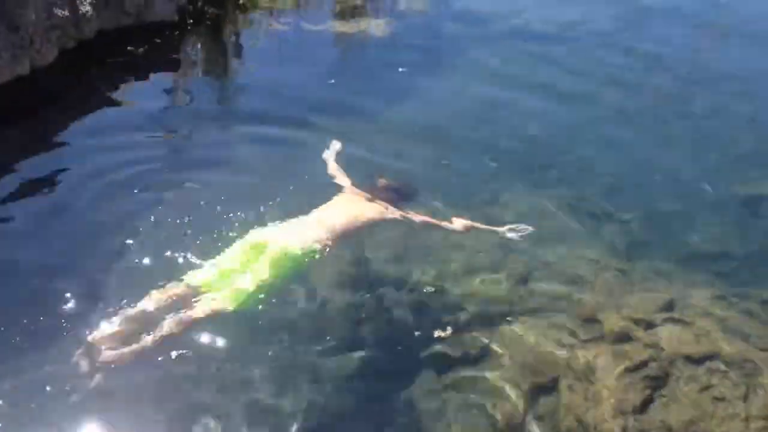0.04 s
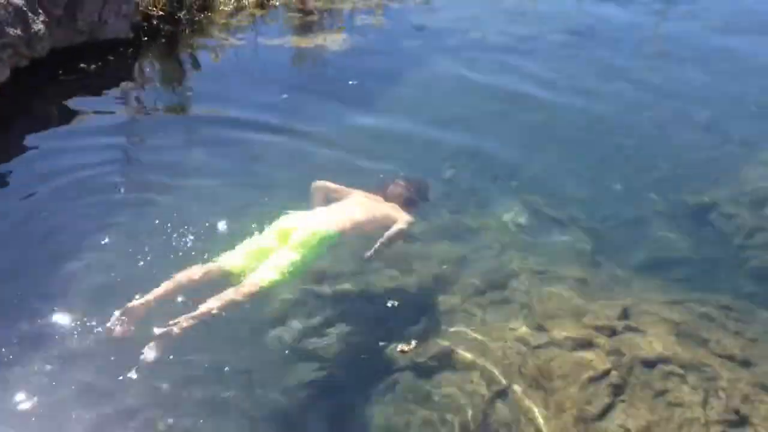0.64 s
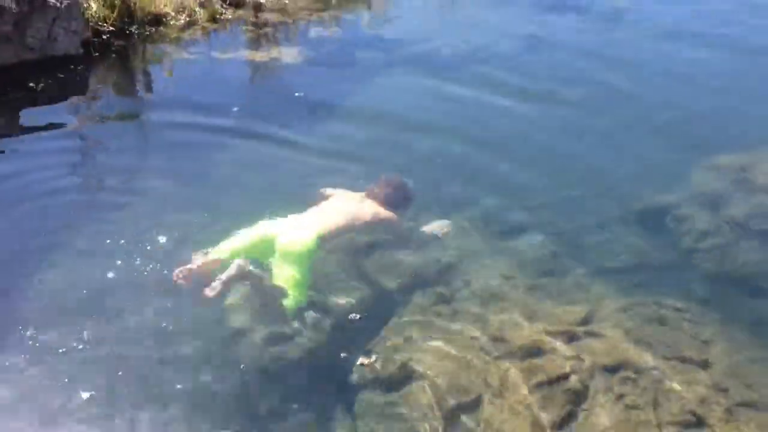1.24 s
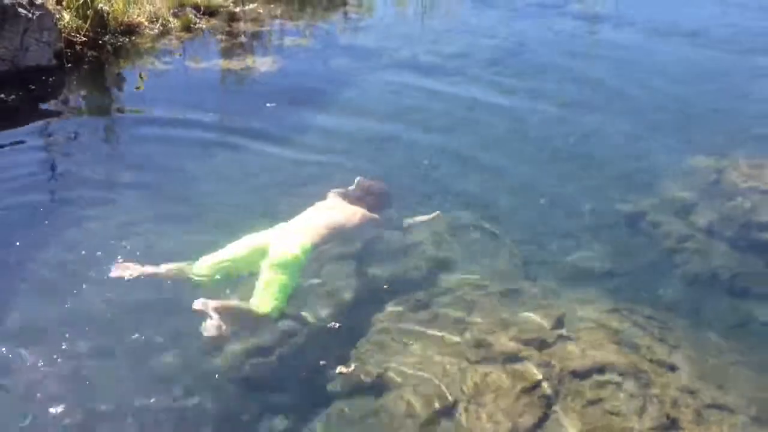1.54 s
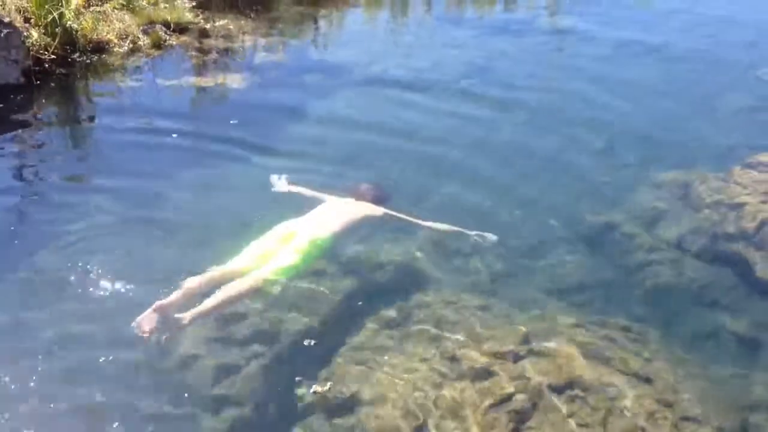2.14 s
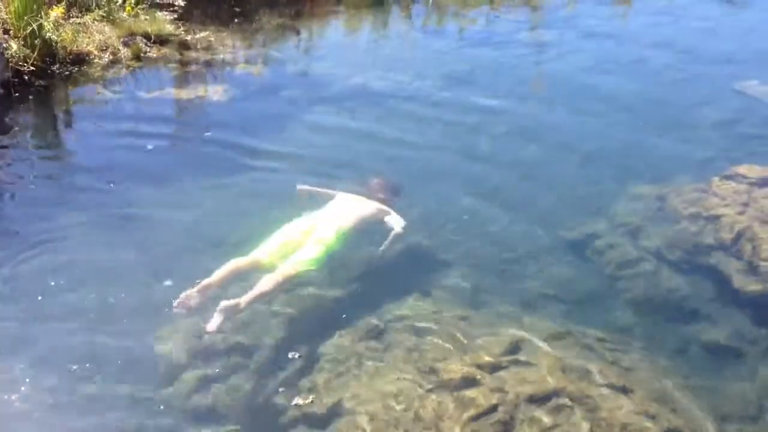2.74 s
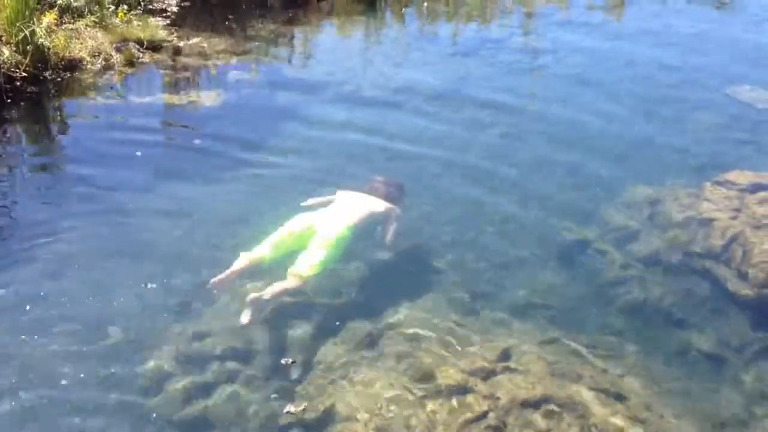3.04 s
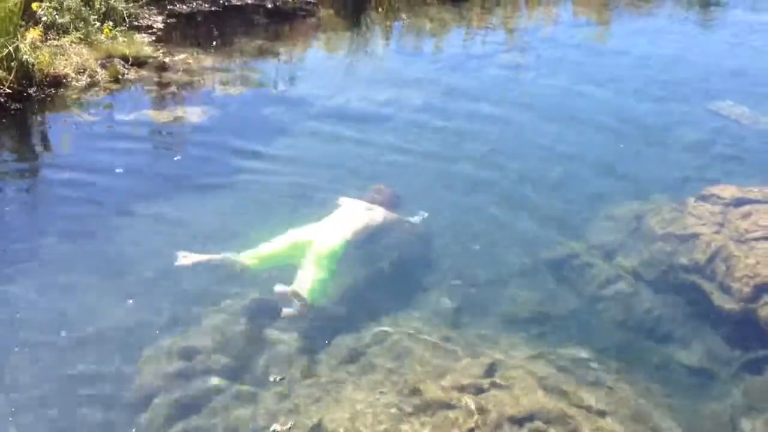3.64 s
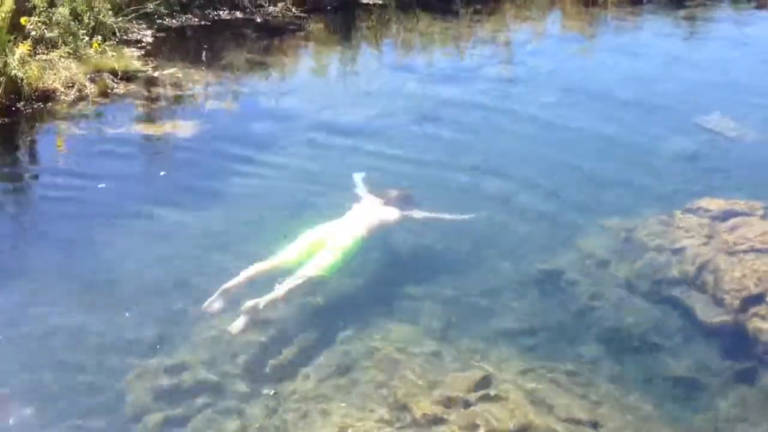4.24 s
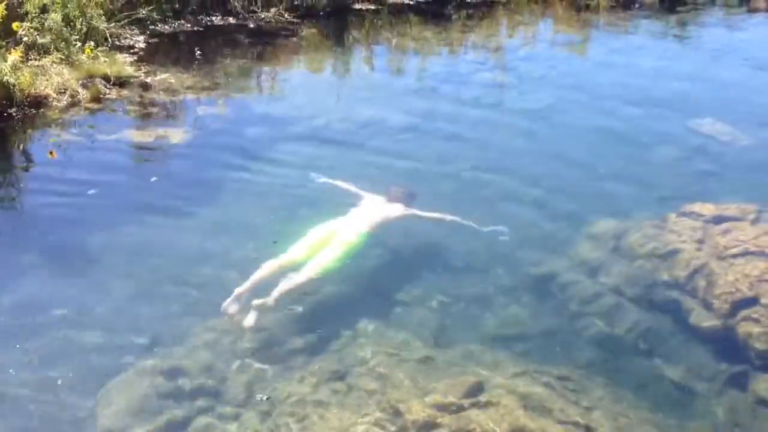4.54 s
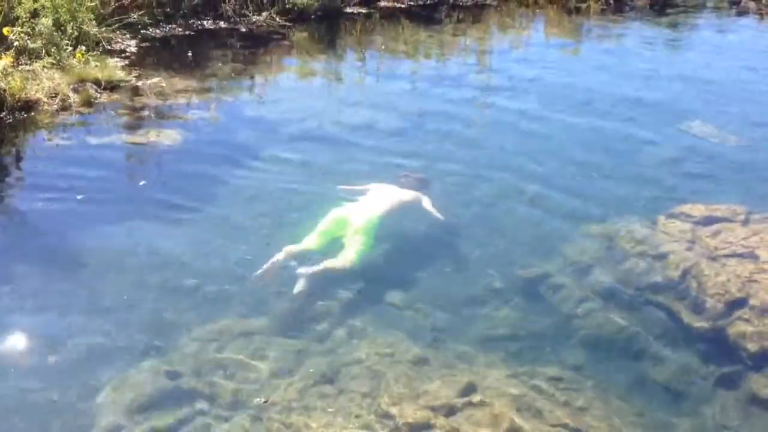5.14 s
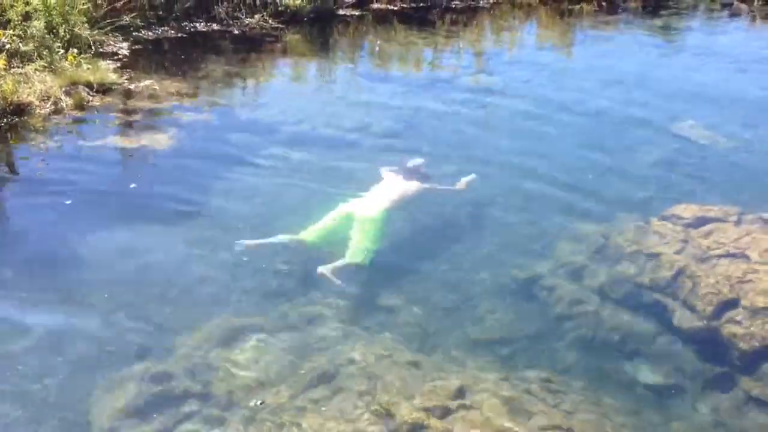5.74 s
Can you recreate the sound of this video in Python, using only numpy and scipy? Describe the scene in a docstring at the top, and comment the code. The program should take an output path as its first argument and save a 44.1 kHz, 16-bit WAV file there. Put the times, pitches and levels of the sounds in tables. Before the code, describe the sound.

A swimmer takes a slow stroke in an outdoor rock pool, a few metres from the microphone. Hands and feet make light splashes, followed by fine spray and small plinking bubbles, while wind softly bumps the microphone. As the water settles, the wind builds into a loud, buffeting gust with sharp crackles that dominates the second half. A very faint, high insect chirps over a quiet hiss of air.

```python
"""A swimmer does a slow breaststroke in a rock pool, a few metres below a hand-held camera.
Hands and feet break the surface in light slaps, spray patters back, and trapped air rings as bubbles.
Wind eddies bump the microphone, softly at first, then in a loud gust whose hardest eddies crack.
Far behind, an insect scrapes faint, high chirps over an even hiss of air."""
import sys
import numpy as np
from scipy import signal
from scipy.fft import rfft, irfft
from scipy.io import wavfile

SR = 44100
rng = np.random.default_rng(int(sys.argv[2]) if len(sys.argv) > 2 else 0)


def inscribe(sig):
    """Save sig as 16-bit PCM at rate SR to the path in sys.argv[1].

    A 1-D sig is mono; a 2-D sig holds one channel per row.
    Samples are clipped to [-1, 1] before scaling.
    """
    pcm = np.round(np.clip(np.atleast_2d(sig).T, -1, 1) * 32767)
    wavfile.write(sys.argv[1], SR, pcm.astype(np.int16))


N = 263718


# hands and feet hitting the water: (time [s], level [dB], plash against hiss [dB])
LIMB_HITS = [(0.738, -42, -9), (0.8434, -53, 3), (0.87, -50.5, 3), (1.346, -39, -35), (1.482, -34.5, -5),
             (1.516, -44.5, -1), (1.5662, -37.5, -6.5), (1.652, -41.5, -35), (1.8094, -41, -13),
             (1.901, -43, -1.5)]

def slaps(gain_db=-7, plash_db=-1, decay_s=0.011, plash_s=0.011, rise_s=0.0011, size=4096):
    """A limb breaks the surface: a bright hiss of spray over a lower plash."""
    out = np.zeros(N)
    t = np.arange(size) / SR
    attack = 1 - np.exp(-t / rise_s)
    plash_band = signal.butter(2, [550, 2300], "bandpass", fs=SR, output="sos")
    hiss_band = signal.butter(2, 3500, "highpass", fs=SR, output="sos")
    for start, db, balance_db in LIMB_HITS:
        droplets = patter(size, drop_rate=32000, scatter_db=3.0, mist=0.23)
        hiss = unit(signal.sosfilt(hiss_band, droplets)) * np.exp(-t / decay_s)
        plash = unit(signal.sosfilt(plash_band, rng.standard_normal(size))) * np.exp(-t / plash_s)
        add(out, start, undb(db + gain_db) * (hiss + undb(balance_db + plash_db) * plash) * attack)
    return out


# the arm pull, then the kick: (time [s], spray level [dB], bubble level [dB], fade [dB/s])
SWIM_STROKES = [(0.72, -63.5, -64, 27), (1.474, -58, -52, 12)]

def churn(t, bubbles=False):
    """Envelope of the stirred water: each stroke swells, then dies away."""
    rise_s = 0.4 if bubbles else 0.0047  # bubbles take time to come up; spray falls back at once
    total = 0
    for start, spray_db, bubble_db, fade_db_per_s in SWIM_STROKES:
        age = np.maximum(t - start, 0)
        db = bubble_db if bubbles else spray_db
        total += (1 - np.exp(-age / rise_s)) * undb(db - fade_db_per_s * age)
    return total


def spray(drop_rate=1800, scatter_db=3.0, mist=0.99, clump_db=2, clump_s=0.006):
    """Fine droplets patter back on the water in clumps, and foam fizzes between them."""
    t = np.arange(N) / SR
    clumps = np.interp(t / clump_s, np.arange(N), rng.standard_normal(N))
    return patter(N, drop_rate, scatter_db, mist) * undb(clump_db * clumps) * churn(t)


# tone of splashing water: (frequency [Hz], gain [dB])
SPLASH_EQ = [(700, -5), (1100, -1), (2000, 0), (2900, -13), (4200, -4), (6500, 1.5), (8500, -3.5),
             (10000, -9.5), (15000, -15)]

def patter(size, drop_rate, scatter_db, mist, bands=26):
    """Tiny impacts of unequal size, each ringing a few cycles in its own band, over a fine mist."""
    impacts = np.zeros(size)
    edges_hz = np.geomspace(900, 15000, bands + 1)
    for low, high in zip(edges_hz, edges_hz[1:]):
        hits = rng.random(size) < drop_rate / bands / SR
        strength = undb(scatter_db * np.minimum(rng.exponential(size=size), 4))
        ticks = hits * strength * rng.choice([-1, 1], size)
        ring = signal.butter(1, [low, high], "bandpass", fs=SR, output="sos")
        impacts += signal.sosfilt(ring, ticks + 1e-9 * rng.standard_normal(size))
    return unit(colour(unit(impacts) + mist * rng.standard_normal(size), SPLASH_EQ))


def wake(plop_db=1, fizz_db=2, gurgle_db=-3, scatter_db=4, glide=0.062, length_s=2.3, count=260):
    """Air dragged under rings as bubbles: small ones plop, tiny ones fizz, big pockets gurgle."""
    out = np.zeros(N)
    for when, pitch, strength, delay in rng.random((count, 4)):
        start = SWIM_STROKES[0][0] + length_s * when
        db = -scatter_db * np.log(strength + 0.083) - scatter_db  # many quiet, a few loud
        plop = undb(plop_db + db) * bubble(850 * 3 ** pitch, cycles=12, glide=glide)
        fizz = undb(fizz_db + db) * bubble(3800 * 2.3 ** pitch, cycles=18, glide=glide)
        gurgle = undb(gurgle_db + db) * bubble(280 * 3 ** pitch, cycles=6, glide=glide)
        add(out, start, churn(start, bubbles=True) * plop)
        for follower in (fizz, gurgle):  # these ride the spray's envelope
            start += delay / 10
            add(out, start, churn(start) * follower)
    return out


# featured bubbles, tiny under drops and larger in the wake: (time [s], level [dB], centre pitch [Hz])
PLINKS = [(0.5526, -57, 5000), (0.581, -57, 2200), (0.723, -56, 1790), (0.833, -53, 2470),
          (0.93, -56, 1074), (0.985, -54, 4360), (1.015, -58, 1065), (1.299, -45.5, 6240),
          (1.3225, -50, 5930), (1.4773, -31, 6400), (1.61, -47, 1240), (1.909, -47.5, 1080),
          (2.166, -53, 4400), (2.46, -47, 6000), (2.622, -61, 3760), (2.797, -58, 4560)]

def plinks(cycles=34, glide_per_s=3.6):
    """Single bubbles stand out; the larger ones ring longer and slide further up through their pitch."""
    out = np.zeros(N)
    for start, db, hz in PLINKS:
        glide = glide_per_s * cycles / hz
        add(out, start, undb(db) * bubble(hz * (1 - glide / 2), cycles, glide))
    return out


def bubble(hz, cycles, glide, size=4096):
    """A bubble rings for some cycles and climbs in pitch as it nears the surface."""
    t = np.arange(size) / SR
    age = t * hz / cycles
    bend = 1 + glide * np.minimum(age, 2)
    return np.sin(2 * np.pi * hz * t * bend) * np.exp(-np.log(30) * age)


# big wind eddies: (time [s], level [dB])
WIND_THUMPS = [(0.011, -42.5), (0.043, -41), (0.169, -53.5), (0.378, -42), (0.508, -44), (0.569, -43.5),
               (0.735, -43.5), (1.1, -49), (1.187, -41.5), (1.271, -45.5), (1.317, -31.5), (1.349, -44),
               (1.48, -42), (1.53, -45.5), (1.562, -40.5), (1.609, -52.5), (2.306, -35.5), (2.396, -29),
               (2.483, -30), (2.57, -37.5), (2.68, -43), (2.875, -47.5), (2.979, -38), (3.013, -37),
               (3.302, -44.5), (3.408, -32), (3.488, -29), (3.582, -24.5), (3.612, -27), (3.641, -30),
               (3.775, -30.5), (3.876, -24), (4.016, -27.5), (4.188, -24.5), (4.264, -31.5), (4.289, -33),
               (4.4, -29), (4.683, -22), (4.711, -24), (4.759, -20), (4.8, -19), (4.862, -18.5),
               (5.035, -21.5), (5.074, -22.5), (5.194, -23), (5.281, -22.5), (5.419, -25.5), (5.595, -29),
               (5.744, -25), (5.775, -25.5), (5.835, -28), (5.879, -24), (5.91, -28.5), (5.958, -30)]

def buffets(gain_db=3.0, calm_hz=263, bright_db=-30, db_per_doubling=3.5):
    """Big eddies thump the microphone port; stronger ones hold smaller swirls and sound brighter."""
    out = np.zeros(N)
    for time, db in WIND_THUMPS:
        corner_hz = calm_hz * (1 + 2 ** ((db - bright_db) / db_per_doubling))
        bump = eddy(db + gain_db, corner_hz, spread_s=0.01, low_hz=190, thump=1.08)
        add(out, time - len(bump) / SR / 2, bump)
    return out


# the hardest eddies: (time [s], thump level [dB], snap level [dB], snap corner [Hz], roughness [ratio])
WIND_CRACKS = [(3.45, -28, -44.5, 1830, 0.42), (3.7175, -24.5, -40, 1130, 0.4),
               (3.914, -19, -38, 1300, 1.05), (3.966, -27, -41.5, 1300, 0.5), (4.116, -16.5, -35, 4600, .1),
               (4.15, -18, -32, 1900, 0.7), (4.371, -24, -30, 1200, 0.58), (4.596, -17.5, -31, 2100, 0.6),
               (4.613, -27, -29, 1900, 0.77), (4.639, -21.5, -31, 1900, 0.4),
               (4.73, -16.5, -33.5, 2670, 0.42), (4.779, -22.5, -26, 2280, 1.1),
               (4.848, -21, -22.5, 3560, 0.93), (4.877, -26.5, -27, 3000, 1.1),
               (4.9812, -29.5, -23, 2630, 0.2), (5.097, -32, -30.5, 4000, 0.08),
               (5.12, -24, -29.5, 2920, 0.8), (5.147, -32, -32.5, 1090, 0.47),
               (5.166, -36.5, -28, 2400, .9), (5.47, -21.5, -42.5, 1700, 0.16),
               (5.519, -23.5, -37, 1930, 0.17), (5.561, -23, -35.5, 1500, 0.38),
               (5.816, -29, -37, 900, 0.42)]

def cracks(snap_gain_db=2.0, rasp_gain_db=-9, thump_gain_db=3, flutter=0.15, flutter_s=0.0018,
           top_hz=8200, size=4096):
    """The hardest eddies snap on top of a thump; the rough ones flutter and rasp as well."""
    out = np.zeros(N)
    t = (np.arange(size) - size / 2) / SR
    snap_band = signal.butter(4, 1000, "highpass", fs=SR, output="sos")
    for time, thump_db, snap_db, corner_hz, rough in WIND_CRACKS:
        push = rough * flutter * rng.standard_normal(size) * bell(t, flutter_s)
        push[size // 2] += rng.choice([-1, 1])
        spike = port(push, low_hz=520, corner_hz=corner_hz, slope=1.77)
        treble_rms = np.sqrt(np.sum(signal.sosfilt(snap_band, spike) ** 2) / (.003 * SR))  # over 3 ms
        snap = undb(snap_db + snap_gain_db) * spike / treble_rms
        rasp = eddy(snap_db + rasp_gain_db, corner_hz=1700, spread_s=0.0087, low_hz=1040, thump=0)
        body = eddy(thump_db + thump_gain_db, corner_hz=700, spread_s=0.011, low_hz=178, thump=0.84)
        add(out, time + t[0], snap + rough * rasp + body)
    return signal.sosfilt(signal.butter(10, top_hz, fs=SR, output="sos"), out)


# level ride of the wind bed between the big eddies: (time [s], level [dB])
WIND_BED = [(0.0, -59), (1.1, -67.5), (1.27, -55.5), (1.43, -48), (1.66, -67), (2.15, -66.5), (2.31, -48.5),
            (2.45, -40.5), (2.55, -40), (2.7, -52.5), (2.98, -66), (3.33, -53.5), (3.61, -36.5),
            (4.03, -32.5), (4.48, -33), (4.78, -27), (5.8, -39), (5.98, -35)]

def breeze(gain_db=-1, scatter_db=6, calm_hz=380, gust_hz=880, count=400):
    """A stream of small eddies; the faster the flow, the louder and brighter they are."""
    out = np.zeros(N)
    times, levels_db = np.transpose(WIND_BED)
    for k, (shift, strength) in enumerate(rng.uniform(-0.996, 1, (count, 2))):
        time = (k + 1 + shift / 2) / (count + 2) * N / SR
        db = np.interp(time, times, levels_db) + scatter_db * strength
        corner_hz = np.interp(db, [-44, -26], [calm_hz, gust_hz])
        bump = eddy(db + gain_db, corner_hz, spread_s=0.0059, low_hz=165, thump=0.82)
        add(out, time - len(bump) / SR / 2, bump)
    return out


def eddy(db, corner_hz, spread_s, low_hz, thump, slope=2.204, size=4096):
    """A brief swell of turbulence round one push of relative size thump; db is its level over 10 ms."""
    t = (np.arange(size) - size / 2) / SR
    swirl = rng.standard_normal(size) * bell(t, spread_s)
    push = swirl / np.linalg.norm(swirl)
    push[size // 2] += thump * rng.choice([-1, 1])
    bump = port(push, low_hz, corner_hz, slope)
    return undb(db) * bump / np.sqrt(np.sum(bump ** 2) / (SR / 100))


def port(push, low_hz, corner_hz, slope, rumble=0.0082):
    """Pressure at the microphone port: the bass is cut, and small swirls roll off above the corner."""
    f = np.fft.rfftfreq(len(push), 1 / SR)
    s = 1j * f / low_hz
    bass_cut = s ** 4 / (1 + 0.78 * s + s ** 2) / (0.47 + s + s ** 2)
    leak = rumble * s / (s + 0.13) / (1 + s)  # a little deep rumble gets past the cut
    turbulence = 1 / (1 + s) / (1 + (f / corner_hz) ** 2) ** slope
    return irfft(rfft(push) * (bass_cut + leak) * turbulence, len(push))


# an insect on the bank, very faint and high: (time [s], level [dB])
INSECT_CHIRPS = [(0.03, -79), (0.48, -70), (3.57, -69), (3.99, -69), (4.48, -68), (4.64, -67.5), (4.9, -66),
                 (5.41, -64), (5.82, -65), (5.88, -62.5)]

def insect(gain_db=-9, wing_hz=8200, width_hz=130, spread_s=0.022, size=8192):
    """Each chirp is a short scrape that rings a narrow wing resonance."""
    out = np.zeros(N)
    t = (np.arange(size) - size / 2) / SR
    f = np.fft.rfftfreq(size, 1 / SR)
    resonance = 1 / (1 + ((f - wing_hz) / width_hz) ** 4)
    for time, db in INSECT_CHIRPS:
        scrape = irfft(rfft(rng.standard_normal(size)) * resonance)
        add(out, time + t[0], undb(db + gain_db) * unit(scrape) * bell(t, spread_s))
    return out


# tone of the background bed: (frequency [Hz], gain [dB])
AIR_EQ = [(40, -8.5), (150, 16.5), (400, 4), (1000, 4), (2000, -1), (3200, -3.5), (5000, -5.5), (7000, -1),
          (8400, -2), (9500, -11), (12000, -6), (15000, -7)]

def air(level_db=-69):
    """Still outdoor air and microphone hiss make a faint, even bed."""
    return undb(level_db) * unit(colour(rng.standard_normal(N), AIR_EQ))


def undb(db):
    """Decibels to gain."""
    return 10 ** (np.asarray(db) / 20)


def unit(x):
    """Scale to rms 1."""
    return x / np.sqrt(np.mean(x ** 2))


def bell(t, spread_s):
    """A smooth fade in and out, centred on t = 0."""
    return np.exp(-.5 * (t / spread_s) ** 2)


def add(out, start, sound):
    """Mix a short sound in at a time in seconds."""
    i = int(start * SR)
    a, b = max(i, 0), min(i + len(sound), len(out))
    if b > a:
        out[a:b] += sound[a - i:b - i]


def colour(x, points):
    """EQ a sound through points of (frequency [Hz], gain [dB])."""
    hz, db = np.transpose(points)
    f = np.maximum(np.fft.rfftfreq(len(x), 1 / SR), 1)
    return irfft(rfft(x) * undb(np.interp(np.log(f), np.log(hz), db)), len(x))


def scene():
    """Mono mix: the swimmer below, wind right on the microphone, insect and air behind."""
    wind = buffets() + breeze() + cracks()
    swimmer = spray() + wake() + slaps() + plinks()
    return (swimmer + wind + insect() + air())[None]


def record(dry):
    """The camera rounds the loudest peaks and cuts the top."""
    top_cut = signal.ellip(10, .2, 70, 15450, fs=SR, output="sos")
    return signal.sosfilt(top_cut, np.tanh(dry))


dry = scene()
out = record(dry)
inscribe(out)
```